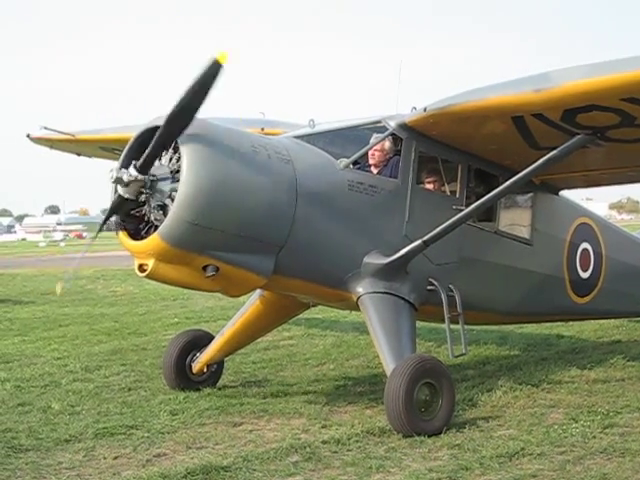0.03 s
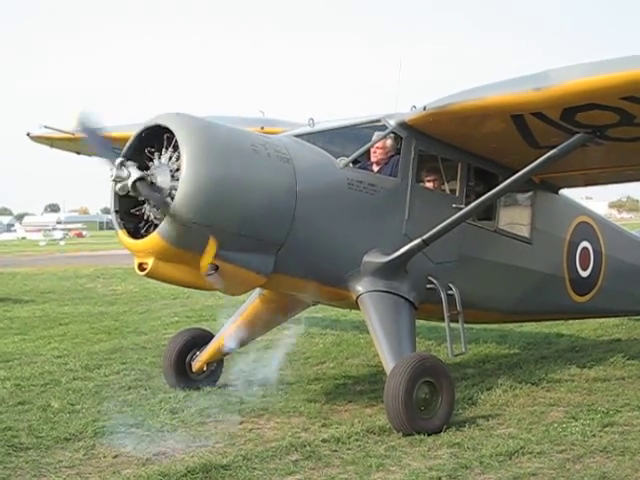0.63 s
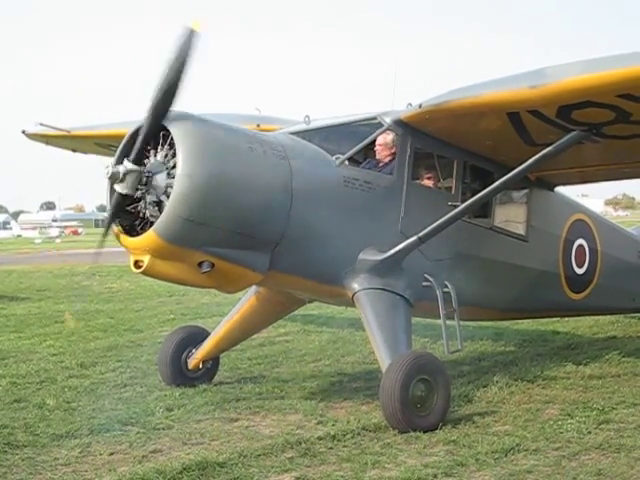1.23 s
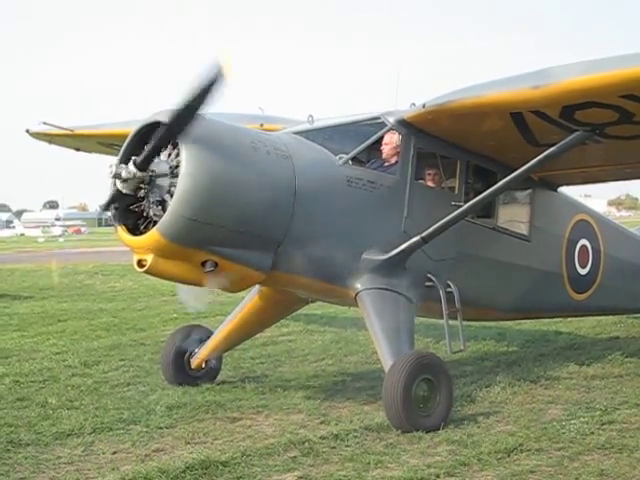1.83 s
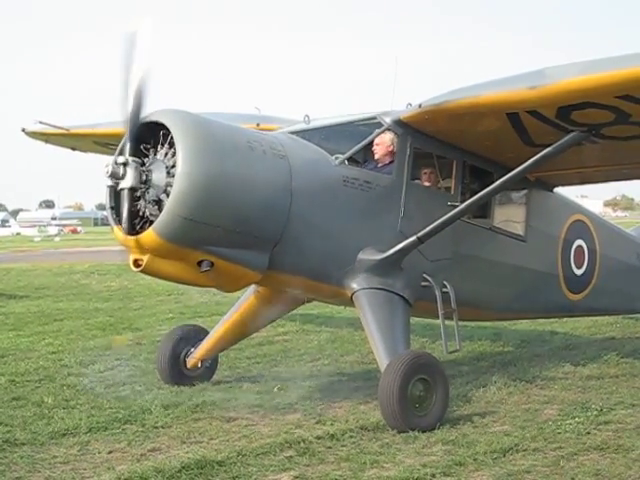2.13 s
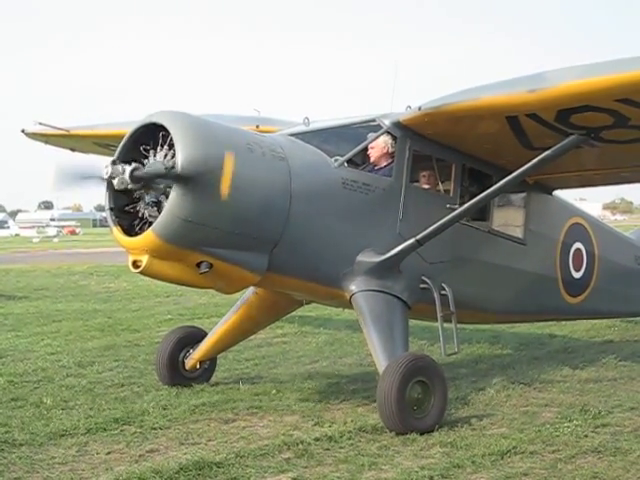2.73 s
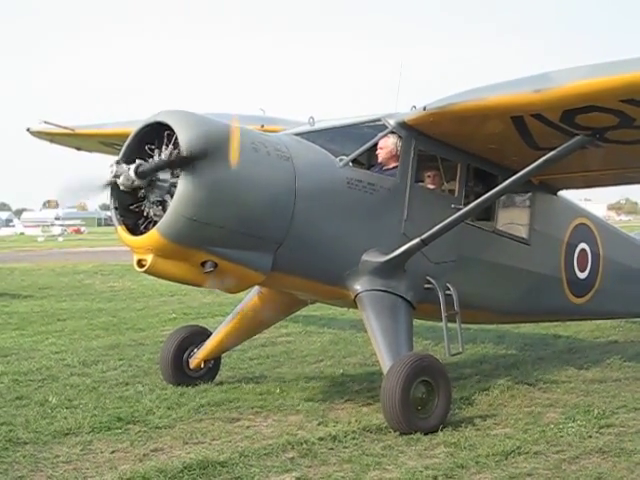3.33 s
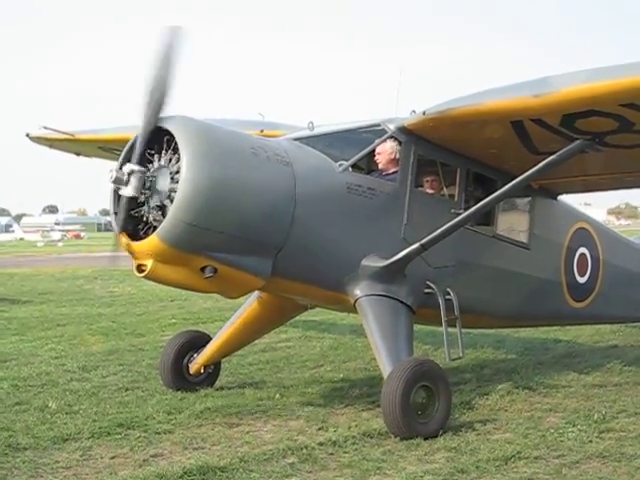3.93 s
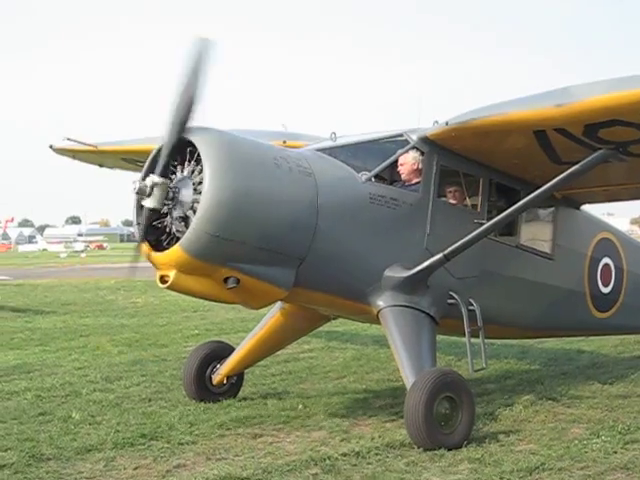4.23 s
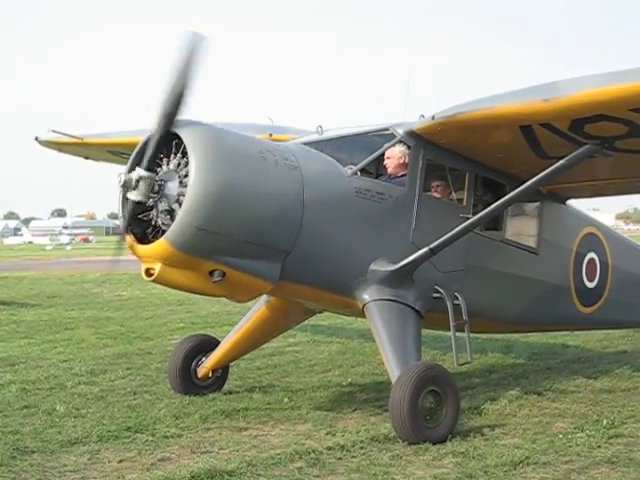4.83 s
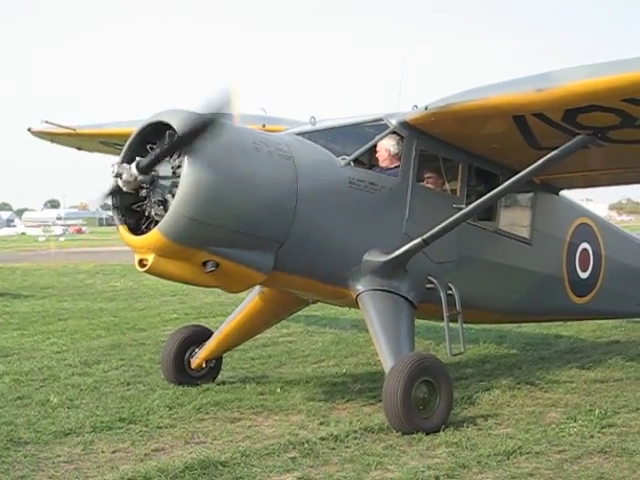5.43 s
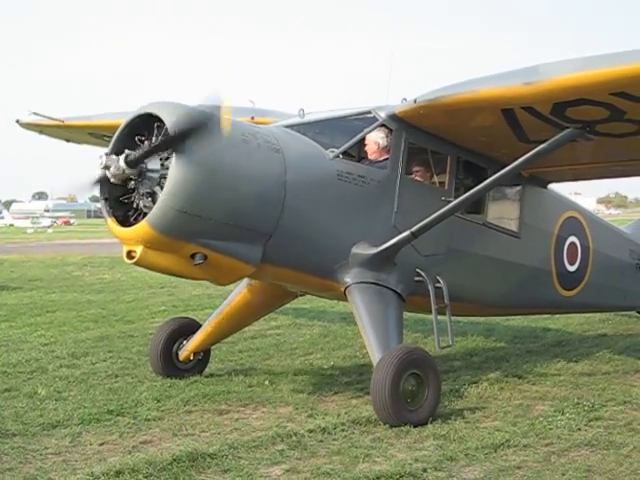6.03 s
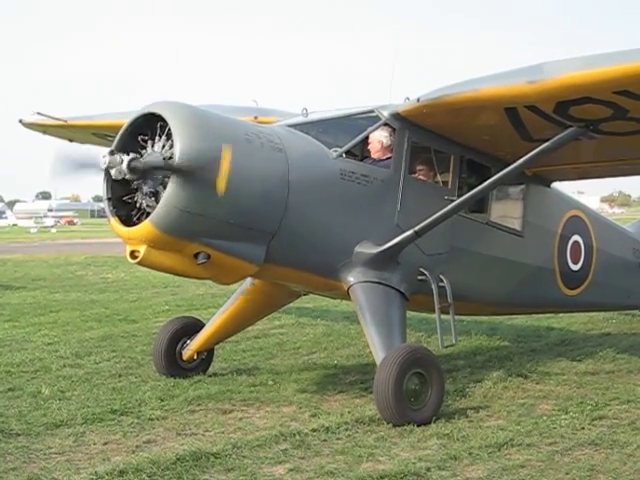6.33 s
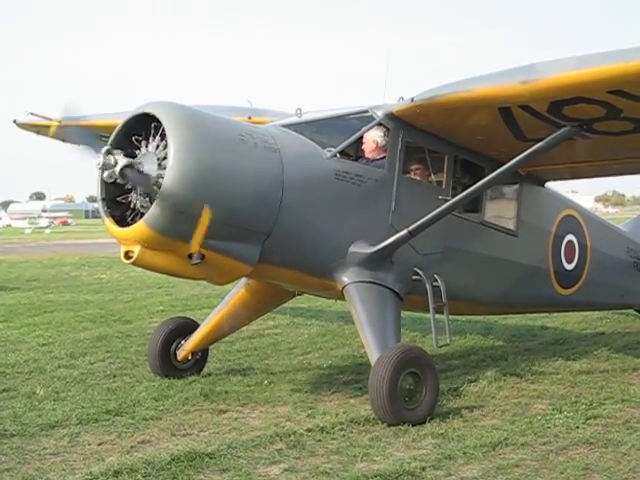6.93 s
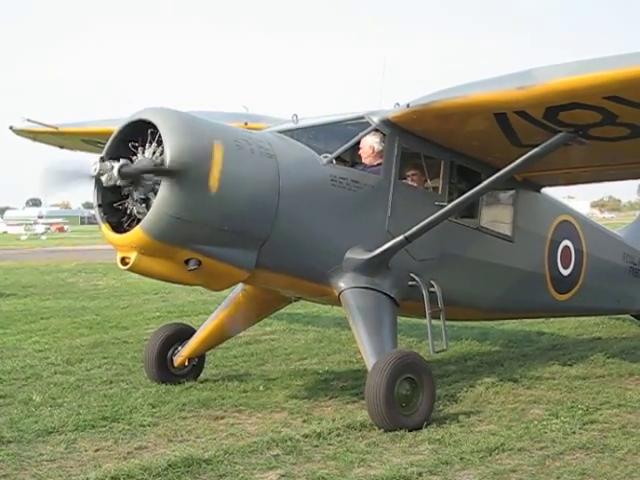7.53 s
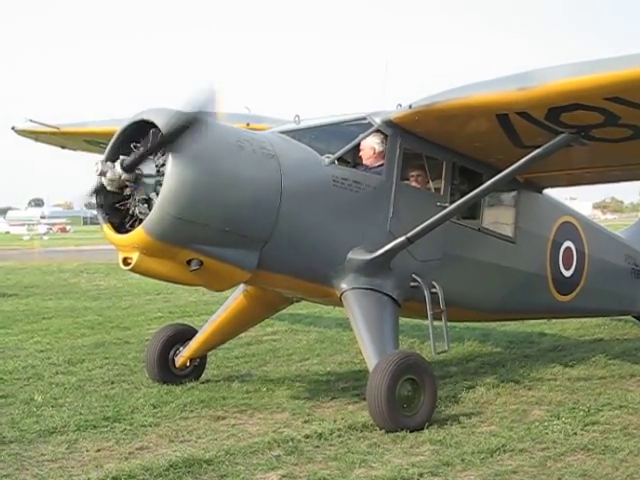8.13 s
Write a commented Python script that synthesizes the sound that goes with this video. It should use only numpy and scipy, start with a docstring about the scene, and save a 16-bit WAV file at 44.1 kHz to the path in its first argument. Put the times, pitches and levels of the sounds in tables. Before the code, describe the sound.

A radial airplane engine catches with uneven bangs and clanks, then settles into a slow, chuffing, clattering idle.

```python
"""On open grass, a few metres away, a radial aircraft engine has just caught and idles very slowly.
At first it bangs unevenly and its slack gears clank. Then one pattern repeats with every engine cycle,
while single cylinders cut in and out: gas chuffs from the valves, thumps out of the exhaust and makes
the pipe whoop, and closing valves ring. All along, valve gear clatters under the cowling (the engine's
metal cover) and the exhaust flow rumbles."""
import sys
import numpy as np
from scipy import signal
from scipy.fft import rfft, irfft
from scipy.io import wavfile

SR = 44100
rng = np.random.default_rng(int(sys.argv[2]) if len(sys.argv) > 2 else 0)


def store_pcm(level_fs):
    """Save levels as 16-bit WAV."""
    pcm = np.round(np.clip(level_fs, -1, 1) * 32767).astype(np.int16)
    wavfile.write(sys.argv[1], SR, np.atleast_2d(pcm).T)


N = 360297
TIME = np.arange(N) / SR
TOP_HZ = 7000  # upper edge of the sound

# The crank's progress; a cycle is two turns. Each row: time in seconds, cycles completed.
CRANK_PROGRESS = [(-.35, -1), (.251, 0), (1.45, 2), (1.968, 3), (2.527, 4), (3.074, 5), (3.617, 6),
                  (4.102, 7), (5.069, 9), (6.534, 12), (7.015, 13), (7.964, 15), (8.44, 16)]
# When each cylinder fires; otherwise it only pumps air. Each pair: start and end in seconds.
FIRING_SPANS = {"A": [(0, .5), (1.4, 3.5), (4.9, 9)], "B": [(3.6, 4.9), (6.5, 9)], "C": [(3, 4.95),
                (5.7, 5.95), (6.6, 9)], "D": [(2.8, 3), (5.2, 6)], "E": [(3.4, 3.6), (5.3, 9)],
                "F": [(2.6, 2.9), (4.6, 4.9), (7.9, 9)], "G": [(1.4, 9)], "steady": [(0, 9)]}

# Below, a "place" runs from 0 to 1 through a cycle. Levels are relative: the functions shift them.
# Gas bursts from the valves. Each row: place, cylinder, level in dB, rise in seconds, treble lift in dB.
VALVE_BURSTS = [(0, "A", -24, .0048, 6.5), (0.121, "B", -22, 0.0059, 2), (0.276, "G", -24.5, 0.0069, -2),
                (.345, "F", -30, 0.0089, -8.5), (.35, "steady", -45.5, 0.0062, -3),
                (.501, "C", -23.5, 0.0055, 3), (0.559, "G", -24.5, 0.006, -5.5), (.63, "D", -20, .003, 1),
                (0.779, "C", -39, .003, 9.5), (0.829, "E", -26.5, .0075, -4.5)]
# Uneven bangs as the engine catches, and a few later accents on the regular chuffs.
# Each row: start in seconds, burst level in dB, rise in seconds, treble lift in dB, thump level in dB.
SINGLE_BANGS = [(0.191, -18, 0.013, -6, -25), (.44, -25, .015, -0.5, -21), (.482, -22.5, 0.0054, 2, -30),
                (0.541, -23, .0043, -20, -23), (0.606, -18.5, 0.0075, -3, -26),
                (0.641, -20.5, 0.0055, 7.5, -22), (.686, -23, 0.0042, -2.5, -36),
                (0.929, -25, 0.01, -18.5, -34), (1.082, -21, 0.015, -6, -26),
                (1.167, -19, 0.0091, -20, -20), (1.306, -27.5, 0.018, -22, -43),
                (1.341, -22.5, .0076, -7, -17.5), (1.371, -19, 0.0059, 4, -26),
                (1.415, -21.5, 0.0067, -12, -23), (1.514, -34, 0.013, -3, -15),
                (1.548, -21, 0.0079, -1.5, -19), (1.621, -21.5, 0.0075, -13, -12),
                (1.674, -22, 0.0076, 4, -30), (1.712, -29.5, 0.003, -12, -32),
                (1.805, -24.5, .012, -6, -17), (1.869, -20.5, .0096, -2, -15),
                (1.942, -25, 0.0097, -5, -17), (2.001, -19.5, 0.0084, -9, -18),
                (2.086, -23, 0.013, -8, -16), (2.216, -30, .0062, 1, -18.5),
                (2.565, -18.5, 0.0057, -24, -18), (2.686, -32.5, 0.0047, -14, -29),
                (2.81, -22.5, 0.0057, -4, -21), (3.991, -25, 0.011, -11, -22),
                (4.102, -32.5, 0.0053, 10, -38), (5.337, -30.5, 0.018, -15, -33),
                (7.044, -25, 0.0086, -18, -38), (7.545, -39, .006, -10, -31)]
# Pressure pulses at the exhaust mouth. Each row: place, cylinder, level in dB.
EXHAUST_PULSES = [(0.259, "G", -22), (.306, "G", -25), (.483, "C", -22), (0.533, "C", -22.5),
                  (0.591, "C", -26), (0.799, "G", -31), (0.937, "E", -28.5)]
# Strokes that ring the pipe. Each row: place, cylinder, length in seconds, boom in dB, late whoop in dB.
PIPE_STROKES = [(0, "B", .195, -28, -38.5), (.01, "steady", .2, -35.5, -37), (.28, "C", .19, -30.5, -35),
                (0.286, "F", .22, -24.5, -42.5), (0.5, "D", .235, -26, -38), (.75, "E", .21, -26, -31.5)]
# Whoops of cylinders that fail to catch. Each row: start in seconds, length in seconds, level in dB.
FAILED_CATCHES = [(.626, 0.3, -25.5), (1.002, .29, -25.5), (1.581, .19, -27.5), (1.898, 0.33, -32.5)]
# Hollow knocks with a rising pitch. Each row: start in seconds, starting pitch in Hz, level in dB.
HOLLOW_KNOCKS = [(0.213, 99.5, -17), (.455, 111, -17.5), (0.611, 316, -33), (0.62, 100, -14),
                 (.641, 590, -26), (1.174, 716, -19), (1.182, 111, -21), (1.356, 243, -25),
                 (1.37, 460, -27), (1.521, 722, -24.5), (1.615, 234, -25), (2.119, 681, -20.5),
                 (3.751, 630, -28.5), (6.457, 581, -26.5)]

# Slack in the crank and gears slamming shut. Each row: start in seconds, level in dB, fade in seconds.
# A "fade" is the time a sound takes to drop by 60 dB.
GEAR_SLAMS = [(0.001, -18.5, 0.044), (0.066, -16.5, 0.13), (0.149, -17, 0.22), (0.306, -19.5, 0.1),
              (0.424, -20, 0.35), (0.858, -16.5, 0.16), (0.892, -14, 0.06), (1.026, -17.5, 0.092),
              (1.061, -14.5, 0.089), (1.161, -17.5, 0.07), (1.236, -17.5, 0.16), (1.272, -17, 0.11),
              (1.506, -32, 0.82), (1.863, -24.5, 0.39), (2.418, -23.5, 0.057), (2.446, -24.5, 0.062),
              (2.974, -29.5, 0.056), (3.111, -22, 0.061), (3.622, -33.5, 0.56)]
# The gears also take up slack once a cycle. In order: place, cylinder, level in dB, fade in seconds.
CYCLE_SLAM = (.806, "E", -29, .16)
# Ringing notes of the steel. Each row: pitch in Hz, level in dB, fade in seconds before extra damping.
STEEL_NOTES = [(930, -8, 0.067), (1900, -1, 0.49), (2880, 8.5, 0.13), (2880, -2, 0.13), (3050, -6.5, 0.3),
               (2830, -5.5, 0.089), (3100, -11.5, .2), (3760, 5.5, 0.1), (3740, -9.5, .12),
               (5140, -11, 0.072), (6200, -37.5, .1)]
# Valves closing in each cycle. Each row: place, cylinder, pitch in Hz, level in dB.
VALVE_CLOSINGS = [(0.206, "steady", 2970, -32), (.31, "C", 2627, -26), (0.357, "steady", 2870, -35.5),
                  (0.419, "steady", 2866, -29.5), (0.697, "steady", 2980, -29.5), (.808, "E", 2650, -26),
                  (0.807, "E", 2874, -27.5), (0.911, "steady", 2940, -29.5)]
# Valves slammed shut by the first kicks. Each row: start in seconds, pitch in Hz, level in dB.
VALVE_SLAMS = [(.074, 2570, -18.5), (.429, 2840, -14.5), (.537, 2788, -19.5), (.86, 2896, -20),
               (1.506, 3010, -20), (2.647, 3000, -24)]

# Running noise between strokes. Each row: time in seconds, exhaust flow in dB, clatter in dB.
RUNNING_LEVELS = [(0.0, -34, -30), (0.95, -30.5, -30), (1.25, -32, -29.5), (1.77, -29, -31),
                  (2.39, -31.5, -31.5), (2.68, -29, -30), (3.53, -37.5, -35.5), (3.87, -32.5, -31),
                  (4.23, -34.5, -32.5), (4.39, -33.5, -33.5), (5.73, -31.5, -31.5), (6.32, -33.5, -33),
                  (7.83, -34, -33.5), (8.17, -28.5, -31)]
# Resonances of the cowling's air and sheet metal. Each row: pitch in Hz, width in Hz, gain in dB.
COWLING_RESONANCES = [(758.4, 52, 1), (891.5, 36, 2), (994, 12, -0.5), (1571, 30, -5), (2430, 5, -13.5),
                      (2030, 47, -17.5), (3710, 250, -11)]
# The tone of each kind of noise, from bass to treble. Each row: frequency in Hz, level in dB.
CHUFF_TONE = [(60, -13.5), (250, 0.5), (460, -8), (620, 3.5), (1150, -6.5), (1550, 4.5), (1900, 0),
              (2200, 6), (2600, 0.5), (3300, 3.5), (4400, 0), (5500, -5), (6300, -19), (7000, -34.5)]
CLANK_TONE = [(60, -25), (300, -12), (470, -12), (650, -4.5), (1200, -3), (2000, -0.5), (2800, 5),
              (3500, -1.5), (4300, -5), (5100, -14.5), (6200, -25), (7000, -40.5)]
CLATTER_TONE = [(80, -36.5), (300, -6.5), (470, -11.5), (620, -0.5), (1150, -5), (1550, -0.5), (1900, -2),
                (2500, 1), (3300, -3), (4000, -5.5), (5000, -11), (6200, -22.5), (7000, -48.5)]
FLOW_TONE = [(10, -28), (22, 1), (36, 4), (70, 3.5), (110, -1), (170, -5.5), (230, -9), (330, -11),
             (450, -17.5), (800, -34), (3000, -63)]


def valve_chuffs(grit_db=1.83, grit_hz=700, treble_hz=4000, tint_db=1.98, size=8192):
    """A valve cracks open: gritty hiss swells quickly and dies as the pressure falls."""
    t, hz, out = np.arange(size) / SR, np.fft.rfftfreq(size, 1 / SR), np.zeros(N)
    jet = unit_rms(rng.standard_normal(N) * amp(grit_db * wander(grit_hz)))
    treble = 1 / (1 + (treble_hz / (hz + 1)) ** 6)
    tint_hz = np.linspace(0, TOP_HZ, 20)
    bursts = [(start, db + strength_db, rise, lift_db)
              for place, cylinder, db, rise, lift_db in VALVE_BURSTS
              for start, strength_db in each_cycle(place, cylinder, misfire_db=-15)]
    bursts += [row[:-1] for row in SINGLE_BANGS]
    for start, db, rise, lift_db in bursts:
        # each burst gets a slightly different tone
        tint = amp(tint_db * np.interp(hz, tint_hz, rng.standard_normal(len(tint_hz))))
        treble_lift = np.sqrt(1 - treble + treble * amp(lift_db) ** 2)
        gas = jet[round(start * SR):][:size]
        hiss = irfft(rfft(gas, size) * tint * treble_lift)
        add(out, start, amp(db) * swell(t, rise) * hiss)
    return shape_tone(out, CHUFF_TONE, COWLING_RESONANCES)


def exhaust_thumps(gain_db=4.5, width_s=0.0018, rebound_s=0.003, lag_s=0.0022):
    """A slug of gas leaves the pipe: a narrow pulse inside a broad opposite swing, with no net flow."""
    t, out = np.arange(-SR // 30, SR // 30) / SR, np.zeros(N)
    pulse = width_s / rebound_s * bell_curve(t, lag_s, rebound_s) - bell_curve(t, 0, width_s)
    for peak_time, db in pressure_pulses():
        add(out, peak_time + t[0], amp(db + gain_db) * pulse)
    return out


def pressure_pulses(pipe_delay_s=0.01):
    """Lists each pulse's time and level in order; a bang's pulse comes just after its burst peaks."""
    regular = [(start, db + strength_db) for place, cylinder, db in EXHAUST_PULSES
               for start, strength_db in each_cycle(place, cylinder, misfire_db=-7)]
    bangs = [(start + pipe_delay_s + .9 * rise, db) for start, _, rise, _, db in SINGLE_BANGS]
    return sorted(regular + bangs)


def exhaust_whoops(open_hz=55, smallest_volume=.057, whoop_gain_db=2, failed_boom_db=-8):
    """Cylinder and pipe ring like a bottle; the note climbs as the rising piston shrinks the space."""
    out = np.zeros(N)
    strokes = [(start, length, db + failed_boom_db, db) for start, length, db in FAILED_CATCHES]
    strokes += [(start, length, boom_db + strength_db, whoop_db)
                for place, cylinder, length, boom_db, whoop_db in PIPE_STROKES
                for start, strength_db in each_cycle(place, cylinder, misfire_db=-10)]
    for start, length, boom_db, whoop_db in strokes:
        progress = np.arange(int(length * SR)) / (length * SR)
        volume = smallest_volume + (1 - smallest_volume) * np.cos(np.pi * progress / 2) ** 2
        turns = np.cumsum(open_hz / np.sqrt(volume)) / SR + rng.random()
        boom = amp(boom_db) * bell_curve(progress, centre=.4, width=.16)
        whoop = amp(whoop_db + whoop_gain_db) * bell_curve(progress, centre=.83, width=.067)
        soft_ends = signal.windows.tukey(len(progress), .1)
        add(out, start, (boom + whoop) * soft_ends * sine(turns))
    return out


def hollow_knocks(rise_s=0.0061, bend_per_s=3.6):
    """A short hollow note swells quickly and dies, its pitch bending upward."""
    t, out = np.arange(SR // 10) / SR, np.zeros(N)
    for start, hz, db in HOLLOW_KNOCKS:
        turns = np.cumsum(hz * (1 + bend_per_s * t)) / SR
        add(out, start, amp(db) * swell(t, rise_s) * sine(turns))
    return out


def gear_clanks(crash_db=3, ring_db=-13, rise_s=0.004, impact=0.17, impact_s=0.0017):
    """Slack gears slam together: a noisy crash, with the steel's strongest notes ringing out."""
    t, crash, ring = np.arange(SR // 3) / SR, np.zeros(N), np.zeros(N)
    place, cylinder, db, fade = CYCLE_SLAM
    regular = [(start, db + strength_db, fade)
               for start, strength_db in each_cycle(place, cylinder, misfire_db=-12)]
    strike = np.minimum(t / rise_s, 1) * (1 + impact * np.exp(-t / impact_s))
    for start, db, fade in GEAR_SLAMS + regular:
        blow = amp(db) * strike
        add(crash, start, blow * die_away(t, fade) * rng.standard_normal(len(t)))
        add(ring, start, blow * steel_ring(t))
    return amp(crash_db) * shape_tone(crash, CLANK_TONE, COWLING_RESONANCES) + amp(ring_db) * ring


def steel_ring(t, damping=1.5):
    """Struck steel rings with several notes at once, each with a random strength."""
    hz, db, fade = np.transpose(STEEL_NOTES)[:, :, None]
    strength, phase = rng.random((2, len(STEEL_NOTES), 1))
    notes = (.5 + strength) * amp(db) * die_away(t, fade / damping) * sine(hz * t + phase)
    return notes.sum(0)


def valve_pings(rise_s=0.0055, fade_s=.1, tremble=0.78, tremble_hz=160, scatter_db=2):
    """Steel rings briefly, trembling as the valve settles on its seat."""
    t, out = np.arange(SR // 5) / SR, np.zeros(N)
    closings = [(start, hz, db + strength_db) for place, cylinder, hz, db in VALVE_CLOSINGS
                for start, strength_db in each_cycle(place, cylinder, misfire_db=-8)]
    envelope = np.minimum(t / rise_s, 1) * die_away(t, fade_s)
    for start, hz, db in closings + VALVE_SLAMS:
        phase, force = rng.uniform(-0.87, 1, 2)
        add(out, start, amp(db + scatter_db * force) * envelope * sine(hz * t + phase))
    return out * (1 + tremble * wander(tremble_hz))


def valve_clatter(gain_db=-1, tick_db=-11, flutter_db=2, flutter_hz=60, sway_db=1.03, peak_place=0.35):
    """Pushrods, rockers and springs tick over a fluttering rustle, swelling a little once a cycle."""
    rustle = unit_rms(rng.standard_normal(N) * amp(flutter_db * wander(flutter_hz)))
    ticks = amp(tick_db) * ticking_parts()
    clatter = unit_rms(shape_tone(rustle + ticks, CLATTER_TONE, COWLING_RESONANCES))
    cycles = np.interp(TIME, *np.transpose(CRANK_PROGRESS))
    sway = amp(sway_db * np.cos(2 * np.pi * (cycles - peak_place)))
    return amp(gain_db) * running_gain(column=2) * sway * clatter


def ticking_parts(scatter_db=4, fade_s=0.05, low_hz=550, high_hz=5000, count=3600):
    """Many small parts tick at random, each with one short ring of its own pitch."""
    t, out = np.arange(SR // 12) / SR, np.zeros(N)
    for (when, pitch), force in zip(rng.random((count, 2)), rng.standard_normal(count)):
        hz = low_hz + pitch * (high_hz - low_hz)
        tick = amp(scatter_db * min(force, 2)) * die_away(t, fade_s) * sine(hz * t)
        add(out, when * N / SR, tick)
    return unit_rms(out)


def exhaust_flow(gain_db=-0.9, surge_db=4.5, surge_s=0.026):
    """Swirling gas rumbles, surging around each pressure pulse and sinking between them."""
    pulse_times = np.transpose(pressure_pulses())[0]
    midpoints = (pulse_times[1:] + pulse_times[:-1]) / 2
    nearest_pulse = pulse_times[np.searchsorted(midpoints, TIME)]
    surge = unit_rms(amp(surge_db * np.exp(-((TIME - nearest_pulse) / surge_s) ** 2)))
    rumble = shape_tone(rng.standard_normal(N), FLOW_TONE)
    return amp(gain_db) * running_gain(column=1) * surge * rumble


def each_cycle(place, cylinder, misfire_db, prime_db=1.5, prime_lasts_s=3.25):
    """Gives a time in seconds and a strength in dB whenever the crank passes this place."""
    times, cycles = np.transpose(CRANK_PROGRESS)
    passes = np.interp(np.arange(cycles[-1]) + place, cycles, times)
    for start in passes[passes < N / SR]:
        # the priming fuel makes strokes stronger until it has burnt off
        boost_db = prime_db / (1 + (start / prime_lasts_s) ** 8)
        fires = any(begin <= start < end for begin, end in FIRING_SPANS[cylinder])
        yield start, boost_db + (0 if fires else misfire_db)


def running_gain(column):
    """One column of the running levels, as a gain for each sample."""
    curve = np.transpose(RUNNING_LEVELS)
    return amp(np.interp(TIME, curve[0], curve[column]))


def shape_tone(sound, tone, resonances=(), size=8192):
    """Filters a sound with a smooth tone curve that has resonant peaks standing on it."""
    hz = np.fft.rfftfreq(size, 1 / SR)
    tone_hz, tone_db = np.transpose(tone)
    curve = amp(np.interp(np.log(hz + 1), np.log(tone_hz), tone_db))
    peaks = sum(amp(db) / (1 + (2 * (hz - pitch) / width) ** 2) for pitch, width, db in resonances)
    gain = unit_rms(curve * (1 + peaks))
    log_gain = np.log(np.r_[gain, gain[-2:0:-1]])
    # minimum phase: the filter rings after a hit, never before it
    response = np.fft.ifft(np.exp(np.conj(signal.hilbert(log_gain)))).real
    return signal.oaconvolve(sound, response[:size // 2])[:N]


def wander(hz):
    """A random wobble, up to about the given rate."""
    roll_off = 1 + (np.fft.rfftfreq(N, 1 / SR) / hz) ** 4
    return unit_rms(irfft(rfft(rng.standard_normal(N)) / roll_off, N))


def swell(t, rise):
    """Climbs to 1 at the rise time, then sinks."""
    return t / rise * np.exp(1 - t / rise)


def die_away(t, fade):
    """Drops by 60 dB over the fade time."""
    return amp(-60 * t / fade)


def bell_curve(x, centre, width):
    """A smooth hump of height 1."""
    return np.exp(-.5 * ((x - centre) / width) ** 2)


def sine(turns):
    """A pure tone, one wave for each turn."""
    return np.sin(2 * np.pi * turns)


def amp(db):
    """Turns decibels into a gain."""
    return 10 ** (np.asarray(db) / 20)


def unit_rms(x):
    """Scales a signal to an average power of 1."""
    return x / np.sqrt(np.mean(x ** 2) + 1e-20)


def add(mix, start_s, sound):
    """Mixes a sound in at the given time."""
    start = round(start_s * SR)
    sound = sound[max(-start, 0):]
    part = mix[max(start, 0):][:len(sound)]
    part += sound[:len(part)]


def scene():
    """All parts of the engine in one channel, with no echo in the open air."""
    metal = gear_clanks() + valve_clatter() + valve_pings()
    exhaust = valve_chuffs() + hollow_knocks() + exhaust_thumps() + exhaust_whoops() + exhaust_flow()
    return (metal + exhaust)[None]


def record(dry, low_cut_hz=27):
    """A mono microphone that loses the deepest bass and the high treble."""
    bass_cut = signal.butter(2, low_cut_hz, "high", fs=SR, output="sos")
    treble_cut = signal.firwin(221, TOP_HZ, window=("kaiser", 8), fs=SR)
    return signal.oaconvolve(signal.sosfiltfilt(bass_cut, dry), treble_cut[None], "same")


dry = scene()
out = record(dry)
store_pcm(out)
```